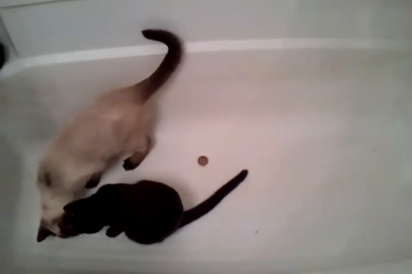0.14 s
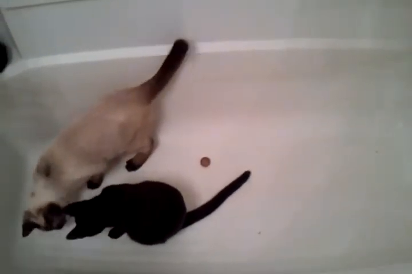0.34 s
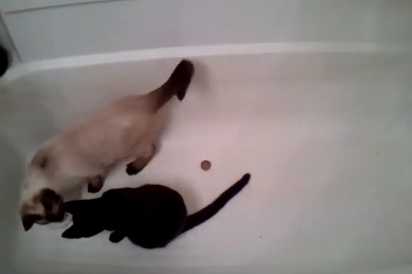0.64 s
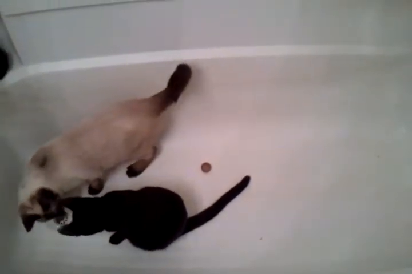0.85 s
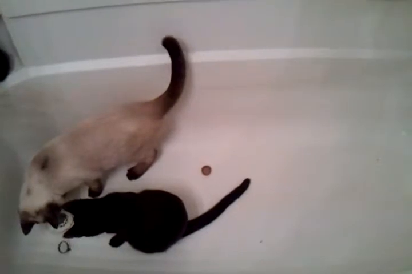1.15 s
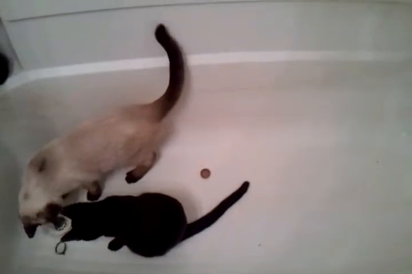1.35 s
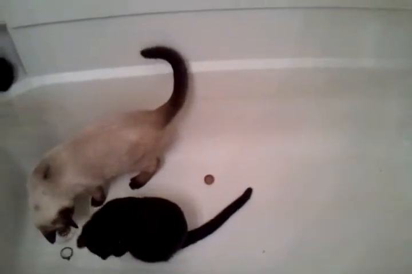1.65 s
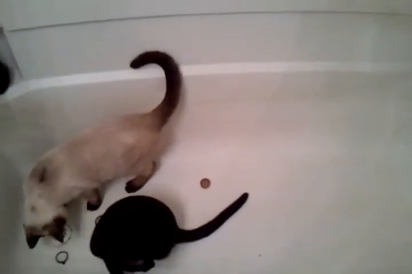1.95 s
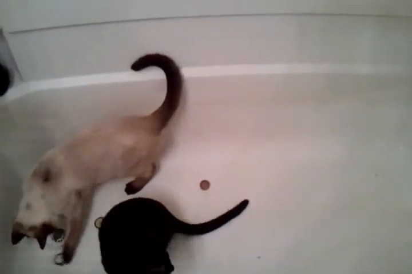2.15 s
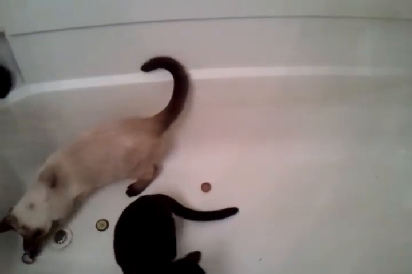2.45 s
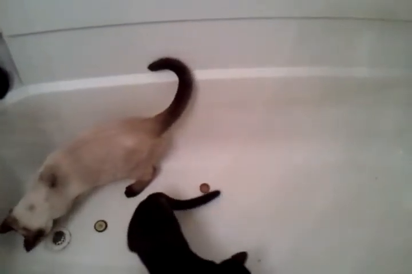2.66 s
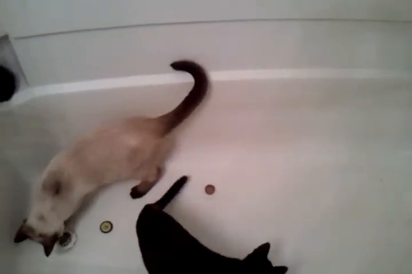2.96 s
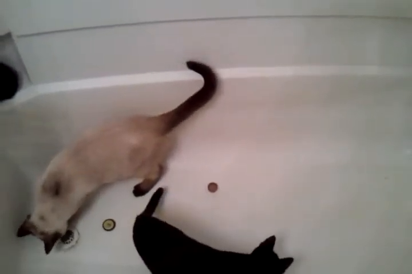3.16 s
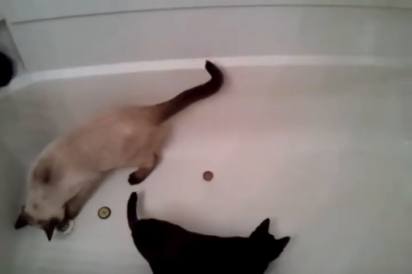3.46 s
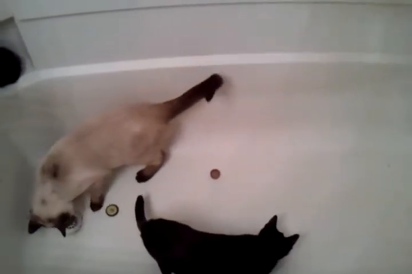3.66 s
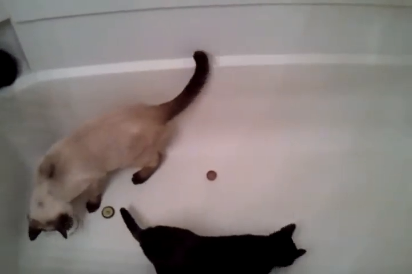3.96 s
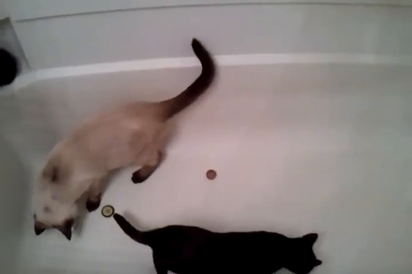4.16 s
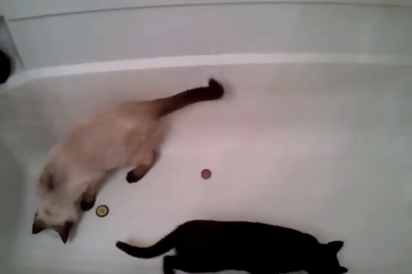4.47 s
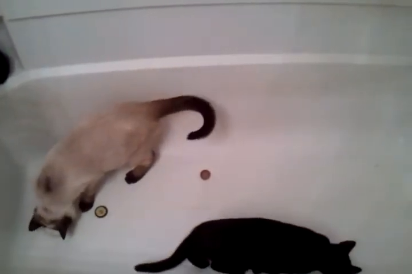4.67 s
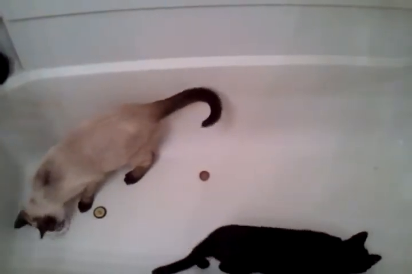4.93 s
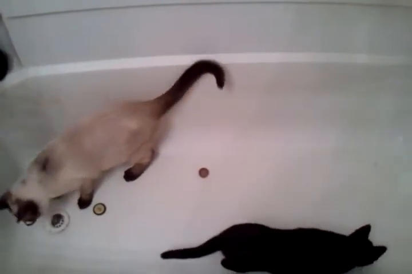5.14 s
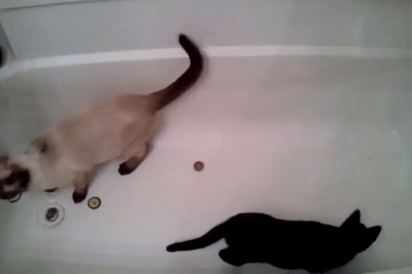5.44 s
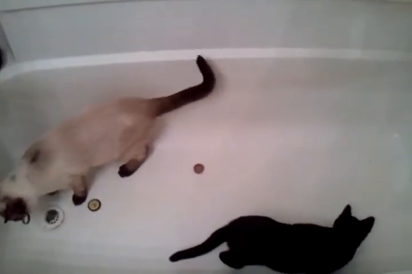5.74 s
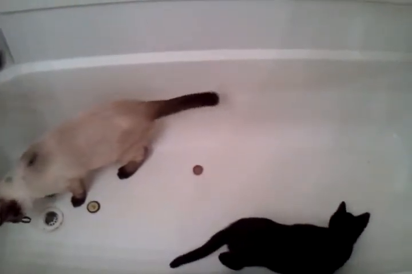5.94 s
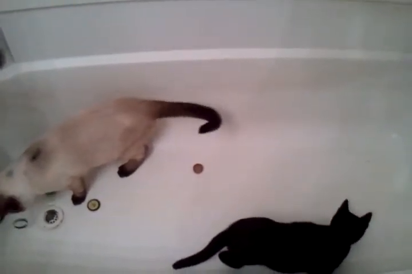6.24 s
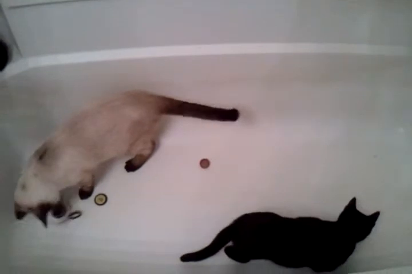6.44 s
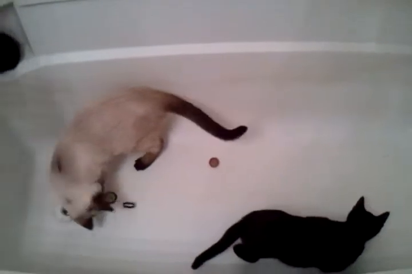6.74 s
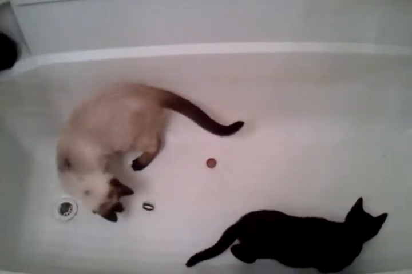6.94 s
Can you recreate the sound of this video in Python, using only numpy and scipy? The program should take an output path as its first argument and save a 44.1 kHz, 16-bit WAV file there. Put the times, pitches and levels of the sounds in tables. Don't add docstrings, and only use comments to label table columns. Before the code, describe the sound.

A small bright microphone above an empty bathtub hears steady hiss and faint hum in an echoing, hard-walled bathroom. In the first 0.9 seconds there are only soft cap nudges and short, faint scratchy slides. A sharp clack lands at 1.0, a cluster at 1.3-1.5, then quick hard ticks around 1.7. From 2.15 to 2.7 a soft paw thud leads into more clacks and a strong tick at 2.5. A cap rocks in little hollow taps from 3.05 to 3.5, then slides softly. Clacks and a loud rim knock come at 4.1-4.3, and the longest scrape at about 4.8. The hardest, brightest hit cracks at 5.6. A kitten meows from 5.95 to 6.65, falling, holding steady, then roughening into a rising trill, as clacks and the heaviest dull thud overlap at 6.4-6.6. One faint scrape ends it near 6.9.

```python
import sys
import numpy as np
from scipy import signal
from scipy.fft import rfft, irfft
from scipy.io import wavfile

SR = 44100
rng = np.random.default_rng(int(sys.argv[2]) if len(sys.argv) > 2 else 0)


def transcribe(signal):
    frames = np.atleast_2d(signal).T
    limited = np.clip(frames, -1, 1)
    pcm = np.round(limited * 32767).astype(np.int16)
    wavfile.write(sys.argv[1], SR, pcm)


def natural_amplitude(level_db):
    exponent = np.asarray(level_db, float) / 20
    return 10 ** exponent


N = 313110


def rms_one(x):
    return x / np.sqrt(np.mean(x ** 2) + 1e-20)


def peak_one(x):
    return x / np.abs(x).max()


def add(track, s, sound):
    at = round(s * SR)
    track[at:at + len(sound)] += sound[:N - at]


def in_time(rows):
    s, *columns = np.transpose(rows)
    t = np.arange(N) / SR
    curves = [np.interp(t, s, column) for column in columns]
    to_nearest_end_s = np.minimum(t - s[0], s[-1] - t)
    return curves, np.clip(to_nearest_end_s / 0.022, 0, 1)


def resonate(x, hz, width_hz):
    r = np.exp(-np.pi * width_hz / SR)
    feedback = [1, -2 * r * np.cos(2 * np.pi * hz / SR), r * r]
    return signal.lfilter(np.array([1, 0, -1]) * (1 - r * r) / 2, feedback, x)


def band(x, low_hz, high_hz):
    return signal.sosfilt(signal.butter(2, [low_hz, high_hz], "band", fs=SR, output="sos"), x)


def drift(rate_hz):
    r = np.exp(-2 * np.pi * rate_hz / SR)
    wander = signal.lfilter([1], [1, -2 * r, r * r], rng.standard_normal(N + SR))
    return rms_one(wander[SR:])


def grains(size, per_s, spread_db):
    chance, strength, side = rng.random((3, size))
    return (chance < per_s / SR) * natural_amplitude(-spread_db * np.log(strength + 0.0013)) * np.sign(side - 0.5)


def knocks(table, width_hz, hollow_hz, hollow_width_hz, crack, lift_db, rise_s):
    wall_lag_s, wall_share = 0.0009257, 0.15
    out = np.zeros(N)
    t = np.arange(1, 401) / SR
    snap = band(np.eye(1, 400)[0], 860, 12000)
    bright = peak_one(band(snap, 2800, 6100))
    wall = np.r_[1, np.zeros(round(wall_lag_s * SR) - 1), wall_share]
    for (s, db, rim_hz, hollow_db, echo_db), tail in zip(table, echoes(count=len(table))):
        rim = crack * snap + resonate(snap, rim_hz, width_hz)
        tipped_db = -min(hollow_db, 0)
        pitch_hz = hollow_hz + 24.5 * tipped_db
        edge_hz = 284 + 44 * tipped_db
        rings = rim + natural_amplitude(hollow_db + lift_db) * resonate(rim, pitch_hz, hollow_width_hz)
        rings = rings * (1 - np.exp(-t / rise_s))
        rings = signal.lfilter(wall, 1, rings)
        direct = natural_amplitude(db - 7.0) * peak_one(band(rings, edge_hz, 16000))
        to_walls = direct + 0.21 * natural_amplitude(db - 6.0) * bright
        add(out, s, direct)
        add(out, s, natural_amplitude(echo_db) * signal.fftconvolve(to_walls, tail))
    return out


def clacks():
    # start in seconds, peak in dB, rim ring in Hz, hollow ring in dB against the peak, echo in dB
    clack_table = [(0.9776, -19, 4720, -11, 1), (1.326, -26.5, 4580, -4, 2.5),
                   (1.4257, -28.5, 4250, 6, 4.5), (1.4345, -27.5, 4900, 10, 2.5),
                   (1.4576, -36, 3640, -37, 8.5), (2.3141, -26, 4850, -20, 5.5),
                   (2.378, -24.5, 4630, -12, 2.5), (2.4019, -17.5, 5000, -45, 12.5),
                   (2.6023, -19, 4990, -41, 10.5), (4.0845, -27, 5000, -7.5, 4),
                   (4.2954, -26.5, 5070, -13, -9), (5.6314, -21, 5200, -19, 2.5),
                   (6.3881, -28, 4770, -9.5, 5), (6.4885, -24, 4900, -14.5, 0.5)]
    return knocks(clack_table, width_hz=1210, hollow_hz=2000, hollow_width_hz=940,
                  crack=0.19, lift_db=12.0, rise_s=0.000076)


def touches():
    # start in seconds, peak in dB, rim ring in Hz, hollow ring in dB against the peak, echo in dB
    touch_table = [(2.598, -34, 5100, -10.5, 12.5), (4.078, -33, 4700, -1, -1), (4.0965, -28.5, 4960, 1, 1),
                   (4.302, -14, 4840, -25, -12.5), (5.5995, -24.5, 4760, -23.5, -7),
                   (5.6082, -6, 4890, -20, -7), (5.7472, -22.5, 4930, -10.5, -7.5),
                   (5.6055, -23, 5040, -29, -18), (5.6095, -9.5, 4800, -39, -12),
                   (5.6135, -14, 5270, -24, -5.5), (6.5698, -23, 4730, -46, 3.5),
                   (6.5755, -17.5, 4900, -28, -6), (6.5838, -22, 5750, -13, -2),
                   (6.5885, -20.5, 4870, -40, -29), (6.599, -22, 4900, -24, -30)]
    return knocks(touch_table, width_hz=600, hollow_hz=2250, hollow_width_hz=800,
                  crack=0.04, lift_db=22, rise_s=0.0008)


def nudges():
    # start in seconds, peak in dB, rim ring in Hz, hollow ring in dB against the peak, echo in dB
    nudge_table = [
        (0.1579, -43, 5500, -10, 5),
        (0.3716, -47.5, 4970, -26, 6.5),
        (1.2481, -36.5, 5060, 2, 7),
        (1.7906, -49.5, 5340, -16, 10),
        (2.1575, -42.5, 4860, -17, 9),
        (2.3036, -39, 5000, -19.5, 10.5),
        (3.7973, -46, 3730, -1, 6.5),
        (4.0008, -47.5, 5170, -16, 11.5),
        (5.3857, -59.5, 4330, -28, 10),
        (5.913, -45.5, 5700, 11, 7.5),
    ]
    return knocks(nudge_table, width_hz=1200, hollow_hz=2050, hollow_width_hz=1100,
                  crack=0.26, lift_db=20, rise_s=0.00013)


def rocks():
    # start in seconds, peak in dB, rim ring in Hz, hollow ring in dB against the peak, echo in dB
    rock_table = [
        (1.42, -41, 4400, 8, 10.5),
        (3.0586, -35.5, 4980, -3, -8),
        (3.258, -41, 4420, 6, 9.5),
        (3.2733, -38, 4620, 7, 8.5),
        (3.3162, -38.5, 4930, 20, 11),
        (3.3308, -34.5, 4700, -6, 0.5),
        (3.466, -39, 3840, -36, 4.5),
        (4.304, -19, 3780, -22, 1),
        (5.5636, -51.5, 3460, -42, 20.5),
    ]
    return knocks(rock_table, width_hz=330, hollow_hz=1530, hollow_width_hz=330,
                  crack=0.058, lift_db=20.5, rise_s=0.000077)


def ticks():
    # start in seconds, peak in dB, ring in Hz
    tick_table = [
        (1.662, -35, 5250),
        (1.678, -21.5, 5300),
        (1.699, -15.5, 5700),
        (1.7154, -48, 5280),
        (2.5001, -11, 5260),
        (2.663, -17, 5050),
        (3.038, -27, 4970),
        (4.7775, -29, 4900),
    ]
    out, click = np.zeros(N), np.eye(1, 400)[0]
    for s, db, hz in tick_table:
        ring = resonate(click, hz, 700) + 0.65 * band(click, 3500, 7100)
        add(out, s, natural_amplitude(db - 16.5) * peak_one(ring))
    return out


def stroke(s, moving_s):
    at_rest_db = -23.5
    slowed_db = -35.5 * moving_s
    full_s = s + 0.024
    slowed_s = full_s + moving_s
    (db,), on = in_time([(s, at_rest_db), (full_s, 0), (slowed_s, slowed_db),
                         (slowed_s + 0.07, slowed_db + at_rest_db)])
    return on * natural_amplitude(db)


def slides():
    # start in seconds, moving time in seconds, rim in dB, hollow in dB, hollow ring in Hz
    slide_table = [
        (-0.06, 0.0083, -46, -46.5, 1850),
        (0.24, 0.14, -48.5, -57, 1820),
        (0.641, 0.044, -45.5, -51.5, 2200),
        (1.78, 0.037, -52.5, -72, 1850),
        (2.859, 0.041, -49, -53, 2050),
        (3.12, 0.02, -50.5, -59, 1810),
        (3.58, 0.25, -51, -57, 1490),
        (4.769, 0.28, -40, -53, 1426),
        (5.34, 0.042, -54.5, -75, 1600),
        (6.86, 0.024, -56, -77, 1880),
    ]
    out = np.zeros(N)
    for s, moving_s, rim_db, hollow_db, hollow_hz in slide_table:
        scratch = grains(N, 2500, 2.1)
        rim = rms_one(resonate(band(scratch, 3600, 6800), 4700, 1000))
        hollow = rms_one(resonate(scratch, hollow_hz, 380))
        out += stroke(s, moving_s) * (natural_amplitude(rim_db - 16.5) * rim + natural_amplitude(hollow_db - 10.5) * hollow)
    return out


def drag():
    slips = grains(N, 420, 0.74)
    low = natural_amplitude(-53.5) * rms_one(resonate(slips, 607, 36))
    high = natural_amplitude(-57.5) * rms_one(resonate(slips, 1390, 60))
    return stroke(4.85, 0.03) * (low + high)


def meow():
    # start in seconds, pitch in Hz, level in dB, mouth opening 0-1, roughness 0-1
    meow_curve = [
        (5.938, 650, -62, 0.02, .3),
        (5.964, 612, -49.5, .05, .35),
        (5.992, 512, -48, .75, .45),
        (6.08, 489, -43.5, .9, .2),
        (6.275, 486, -43.5, .85, .15),
        (6.315, 535, -51, .55, .6),
        (6.44, 548, -49.5, .45, .6),
        (6.495, 548, -54, .55, .7),
        (6.67, 612, -58, .45, .8),
    ]
    overtone_db = [-10.5, -9]
    closed_loss_db = [11, 34]
    strain_gain_db = [14, 7]
    trill_hz, trill_pitch, trill_depth = 48, 0.035, 0.45
    pitch_wobble = 0.04
    (hz, level_db, opening, rough), on = in_time(meow_curve)
    levels_db = [level_db]
    for db, loss_db, strain_db in zip(overtone_db, closed_loss_db, strain_gain_db):
        levels_db.append(level_db + db - loss_db * (1 - opening) ** 2 + strain_db * rough)
    beat = np.sin(2 * np.pi * np.cumsum(trill_hz * (1 + 0.16 * drift(12))) / SR)
    flutter = 1 + trill_depth * beat
    wobble = pitch_wobble * (rough + 0.115) * drift(30.5)
    phase = 2 * np.pi * np.cumsum(hz * (1 + trill_pitch * beat + wobble)) / SR
    voice = np.zeros(N)
    for k, db in enumerate(levels_db):
        unsteady_db = (1.3 + (1.2 + 1.6 * k) * rough) * drift(41)
        voice += natural_amplitude(db - 1.5 + unsteady_db) * np.sin((k + 1) * phase)
    breath = resonate(resonate(rng.standard_normal(N), 4700, 400), 4700, 500)
    breath_db = level_db - 14.5 - 10 * (1 - opening)
    return on * (flutter * voice + natural_amplitude(breath_db) * rms_one(breath))


def thuds():
    # start in seconds, peak in dB, panel ring in Hz, time to fall by 60 dB in seconds
    thud_table = [
        (0.977, -53, 283.5, 0.4),
        (2.154, -47.5, 290, 0.26),
        (2.542, -54.5, 152, 0.62),
        (2.599, -56, 519, 0.15),
        (3.811, -53, 282, 0.12),
        (4.084, -51, 483, 0.27),
        (4.101, -55, 270, 0.32),
        (4.305, -55.5, 465, 0.47),
        (5.607, -51, 452, 0.24),
                  (6.49, -44.5, 283, 0.28),
        (6.567, -41.5, 297.6, 0.29),
    ]
    out, t = np.zeros(N), np.arange(SR // 2) / SR
    for s, db, hz, t60 in thud_table:
        swell = (1 - np.exp(-t / 0.005)) * natural_amplitude(-60 * t / t60)
        puff = rms_one(band(rng.standard_normal(len(t)), 0.54 * hz, 2.06 * hz))
        add(out, s, natural_amplitude(db) * swell * (np.sin(2 * np.pi * hz * t) + 0.4 * puff))
    return out


def tub_air(x):
    # note of the air in Hz, width in Hz, level in dB
    air_notes = [(487, 22, -3), (620, 30, -6)]
    return x + sum(natural_amplitude(db) * resonate(x, hz, width_hz) for hz, width_hz, db in air_notes)


def echoes(count):
    # pitch in Hz, time to fall by 60 dB in seconds
    decay_curve = [(250, 0.11), (600, 0.48), (1400, 0.58), (3000, 0.32), (5200, 0.35), (8000, 0.2)]
    t = np.arange(SR // 2) / SR
    early = grains(count * len(t), 3600, 0.93).reshape(count, -1) * np.exp(-t / 0.015)
    dense = early + 0.2 * rng.standard_normal(early.shape)
    edges = np.geomspace(100, 9500, 12)
    hz, t60 = np.transpose(decay_curve)
    tail = 0
    for k, (low, high) in enumerate(zip(edges, edges[1:])):
        band_t60 = np.interp(np.log(low * high) / 2, np.log(hz), t60)
        tail = tail + (-1) ** k * band(dense, low, high) * natural_amplitude(-60 * t / band_t60)
    tail *= np.clip(t / 0.0008, 0, 1)
    return tail / np.sqrt(np.sum(tail ** 2, axis=1, keepdims=True))


def bathroom(x):
    return signal.fftconvolve(x, echoes(count=1)[0])[:N]


def microphone(x):
    x = natural_amplitude(5.0) * (x + natural_amplitude(-9.5) * resonate(x, 5240, 490))
    return signal.sosfilt(signal.butter(4, 7070, fs=SR, output="sos"), x)


def hiss():
    # pitch in Hz, level in dB per Hz
    hiss_curve = [(15, -52), (25, -13.5), (213, -1.5), (279, -2), (331, -0.5), (528, -0.5), (822, -4),
                  (2040, -6.5), (3180, -8.5), (5080, -6.5), (7530, -11.5), (8300, -21), (8940, -35),
                  (11600, -44), (19700, -120)]
    hz = np.maximum(np.arange(N // 2 + 1) * SR / N, 1)
    curve_hz, curve_db = np.transpose(hiss_curve)
    colour = natural_amplitude(np.interp(np.log(hz), np.log(curve_hz), curve_db))
    noise = rms_one(irfft(rfft(rng.standard_normal(N)) * colour, N))
    noise = natural_amplitude(-60.5 + 1.0 + 0.5 * drift(14.0)) * noise
    return noise + natural_amplitude(13.5) * resonate(noise, 284.5, 1.67)


def hum():
    # tone in Hz, rms level in dB
    hum_tones = [(60, -85), (120, -83.5)]
    t = np.arange(N) / SR
    return sum(natural_amplitude(db + 3.0) * np.sin(2 * np.pi * hz * t) for hz, db in hum_tones)


def scene():
    caps = clacks() + touches() + nudges() + rocks()
    slide, cat = slides(), meow()
    bright = microphone(caps + slide + ticks() + natural_amplitude(-7) * bathroom(slide))
    voice = tub_air(cat + natural_amplitude(-7) * bathroom(cat))
    return (bright + voice + drag() + thuds() + hiss() + hum())[None]


def band_limit(x):
    return signal.sosfilt(signal.butter(12, 9090, fs=SR, output="sos"), x)


def record(dry):
    cut = signal.sosfilt(signal.cheby2(12, 60, 9800, fs=SR, output="sos"), dry)
    return band_limit(cut)


dry = scene()
out = record(dry)
transcribe(out)
```